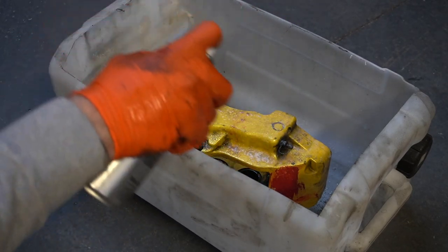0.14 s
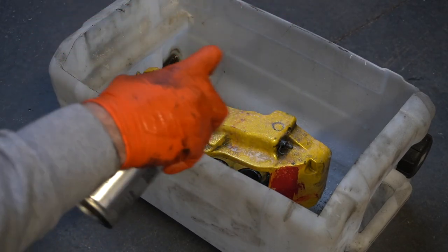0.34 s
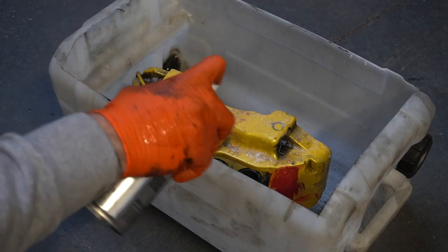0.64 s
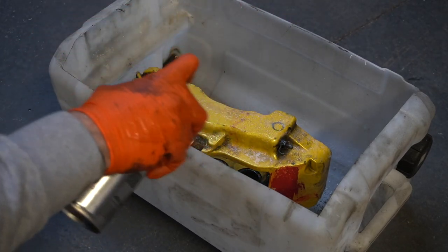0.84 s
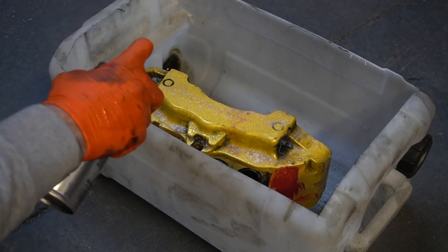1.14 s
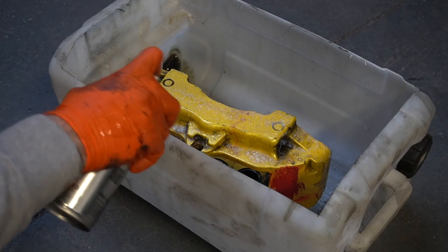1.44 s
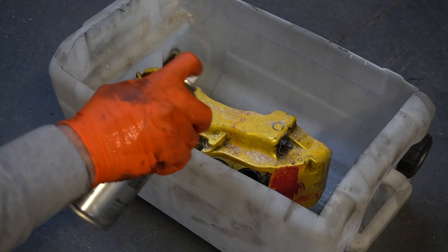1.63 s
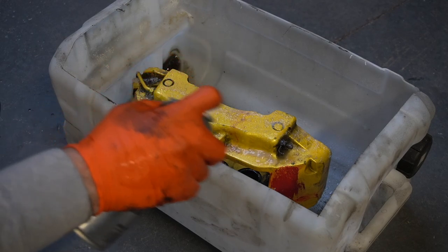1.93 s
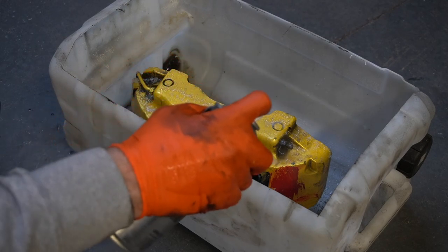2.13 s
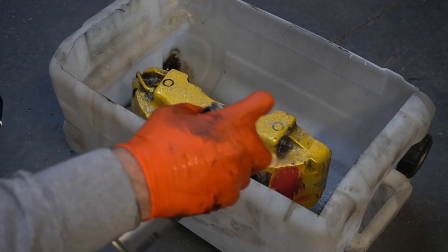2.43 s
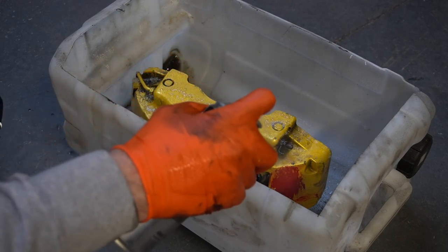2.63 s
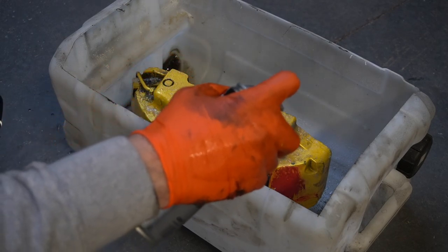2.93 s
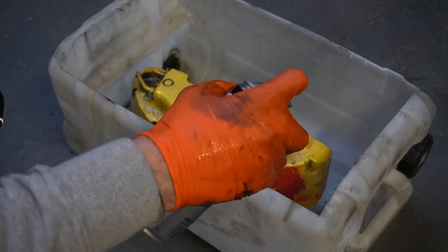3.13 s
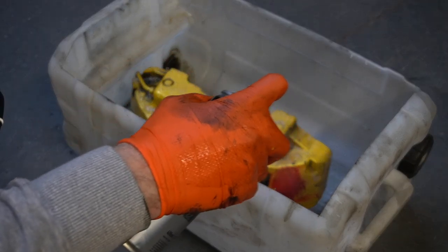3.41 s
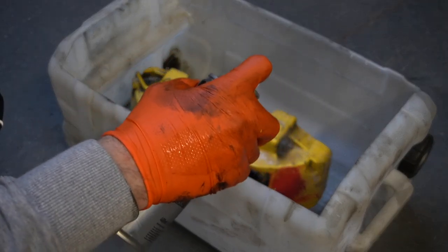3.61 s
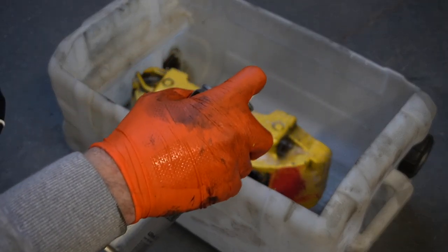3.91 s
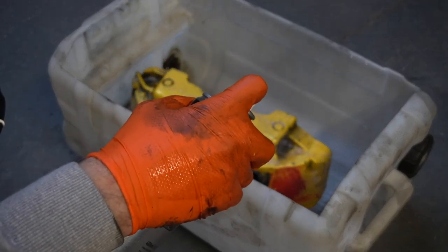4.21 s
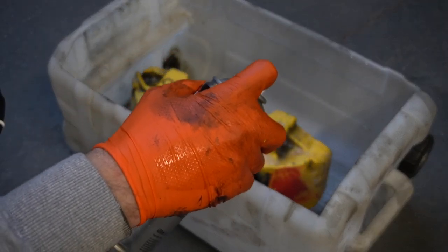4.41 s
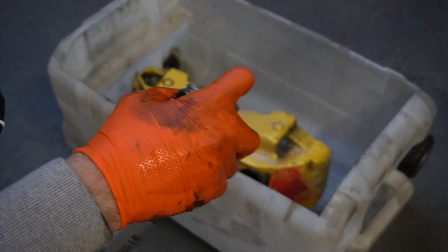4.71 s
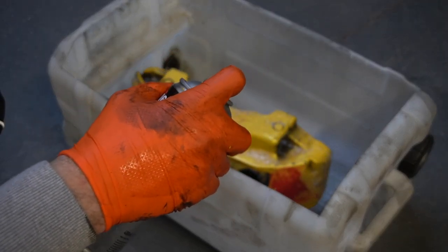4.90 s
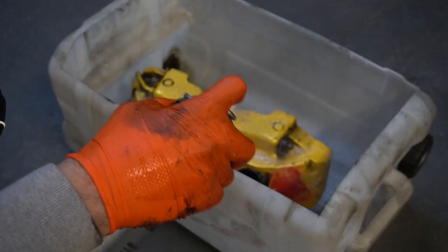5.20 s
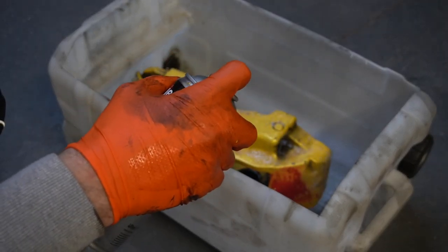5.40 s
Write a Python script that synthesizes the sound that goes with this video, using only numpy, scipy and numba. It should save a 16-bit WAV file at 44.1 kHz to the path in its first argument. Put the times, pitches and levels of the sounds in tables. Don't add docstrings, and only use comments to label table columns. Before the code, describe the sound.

Twenty-two short, sizzling aerosol puffs, each starting with a soft pop, splash onto metal inside a ringing plastic tub in a garage.

```python
import sys
import numpy as np
from scipy import signal
from scipy.fft import rfft, irfft, next_fast_len
from scipy.io import wavfile
from scipy.ndimage import uniform_filter1d
from numba import njit

SR = 44100
rng = np.random.default_rng(int(sys.argv[2]) if len(sys.argv) > 2 else 0)


def to_wav(sig):
    pcm = np.clip(np.atleast_2d(sig), -1, 1) * 32767
    pcm = np.round(pcm).astype(np.int16)
    wavfile.write(sys.argv[1], SR, pcm.T)


def volts_from_decibels(level):
    exponent = np.asarray(level, float) / 20
    return 10 ** exponent


N = 244755
TIME = np.arange(N) / SR

# opens t/s, finger lifts t/s, full jet level/dB, short of full at first/dB, splash over jet/dB
VALVE_PRESSES = [(0.025, 0.145, -42, 3, -29.5), (0.302, 0.502, -43, 7, -24.5),
                 (0.586, 0.726, -42.5, 3, -28.5), (0.813, 0.963, -42, 5, -26.5),
                 (1.056, 1.186, -43, 1, -28), (1.25, 1.37, -42.5, 6, -29), (1.460, 1.581, -42.5, 4.5, -32),
                 (1.758, 1.882, -42.5, 8, -28.5), (2.036, 2.175, -43.5, 7, -23.5),
                 (2.368, 2.487, -43.5, 6.5, -27), (2.585, 2.686, -42.5, 4, -29.5),
                 (2.773, 2.886, -43, 3.5, -28.5), (2.966, 3.099, -42.5, 2.5, -27.5),
                 (3.196, 3.322, -42, 5, -28), (3.397, 3.516, -42, 4.5, -30), (3.608, 3.715, -42.5, 4, -29),
                 (3.978, 4.088, -43.5, 10, -23.5), (4.236, 4.345, -43.5, 7.5, -25.5),
                 (4.468, 4.596, -42.5, 8, -27), (4.679, 4.798, -42, 3.5, -30),
                 (5.185, 5.299, -45, 9.5, -26), (5.466, 5.618, -42.5, 7.5, -26.5)]
# low ring/dB, high ring/dB, octave of the high ring/dB
HAND_PLACE = [(0.09, 1.87, 1440, 2170, -17, -18, -24), (0.37, 2.16, 1640, 2410, -23, -17, -9.5),
              (0.45, 1.88, 1580, 1980, -16.5, -23, -21), (0.65, 1.54, 1590, 2040, -19, -19, -30),
              (0.88, 1.71, 1340, 1990, -19, -17, -21), (1.2, 1.42, 1380, 2130, -13.5, -16.5, -22),
              (1.53, 1.49, 1480, 2150, -20.5, -19.5, -17), (1.82, 1.7, 1630, 2370, -18.5, -20, -13.5),
              (2.1, 1.97, 1510, 2270, -13.5, -12.5, -12.5), (2.43, 1.7, 1460, 2280, -14.5, -13, -20),
              (2.65, 2.03, 1450, 2280, -20.5, -13, -13.5), (2.84, 2, 1580, 2230, -17.5, -14, -28),
              (3.03, 2.05, 1490, 2310, -13.5, -15, -15.5), (3.46, 1.98, 1550, 2320, -16.5, -16.5, -16),
              (4.04, 2.24, 1420, 2180, -16, -14.5, -22), (4.5, 2.04, 1404, 2264, -18, -14.5, -15),
              (5.5, 2.21, 1370, 2260, -17, -14, -25)]


def along(table, hz):
    f, v = np.transpose(table)
    return np.interp(np.log(np.maximum(hz, 1)), np.log(f), v)


def curves(rows):
    s, *columns = np.transpose(rows)
    return [np.interp(TIME, s, c) for c in columns]


def colour(x, table):
    size = next_fast_len(x.shape[-1], True)
    gain = volts_from_decibels(along(table, np.fft.rfftfreq(size, 1 / SR)))
    return irfft(rfft(x, size) * gain, size)[..., :x.shape[-1]]


def unit(x):
    return x / np.sqrt(np.mean(x ** 2))


def shaped(table, channels=1):
    return unit(colour(rng.standard_normal((channels, N)), table))


def walk(rate):
    hold = max(int(SR / rate), 2)
    steps = rng.standard_normal(N // hold + 1)[np.arange(N) // hold]
    return unit(uniform_filter1d(uniform_filter1d(steps, hold), hold))


@njit
def late(x, ms):
    y = np.zeros(len(x))
    for i in range(len(x)):
        at = i - ms[i] * SR / 1000
        k = int(at)
        if at > 1:
            u, a, b, c, d = at - k, x[k - 1], x[k], x[k + 1], x[k + 2]
            cubic = 3 * (b - c) + d - a
            square = 2 * a - 5 * b + 4 * c - d
            y[i] = b + u * (c - a + u * (square + u * cubic)) / 2
    return y


@njit
def resonance(x, hz, width_hz):
    y, band, low = np.empty(len(x)), 0., 0.
    for i in range(len(x)):
        g, k = np.tan(np.pi * hz[i] / SR), width_hz / hz[i]
        v = (band + g * (x[i] - low)) / (1 + g * (g + k))
        band, low, y[i] = 2 * v - band, low + 2 * g * v, k * v
    return y


def stereo(mid, side):
    # f/Hz, side minus mid/dB
    capsule_width = [(60, -29), (110, -37), (200, -29), (380, -19.5), (700, -17.5), (1290, -14),
                     (2380, -18.5), (4400, -12), (8120, -6.5), (15000, -7.5)]
    side = colour(side, capsule_width)
    return np.array([mid + side, mid - side])


def hum():
    # t/s, half length/s, boom up/dB, drone up/dB
    thuds = [(0.71, 0.11, 2.5, 5), (0.83, 0.12, 4, 2), (1.14, 0.075, 2.5, 9), (2.44, 0.069, 1, -3),
             (2.837, 0.16, 0, 6), (2.947, 0.1, 2, -7), (3.57, 0.3, 4, 0.5), (4.33, 0.26, 4, 0.5),
             (4.82, 0.3, 3, 2), (5.072, 0.25, 11, -2.5), (5.26, 0.08, 9, 5), (5.55, 0.16, 11, 6)]
    # f/Hz, level/dB per Hz
    boom_colour = [(20, -21), (50, -6.5), (70, -7), (85, 3.5), (105, -3), (130, -6), (200, -63.5)]
    # f/Hz, level/dB per Hz
    drone_colour = [(90, -38), (140, -0.5), (165, -5), (200, -1), (300, -6), (450, -10), (600, -20),
                    (1000, -28.5)]
    # f/Hz, level/dB per Hz
    hiss_colour = [(300, -18), (600, 4.5), (1600, -5), (4000, -5), (8000, 0), (12000, 3), (16000, -1.5)]
    leftover_colour = [(700, -26), (1400, 1), (8000, -3), (16000, -8)]  # f/Hz, level/dB per Hz
    wander_db = 1.5

    at, half, boom_up, drone_up = np.transpose(thuds)
    swell = np.maximum(1 - np.abs(TIME[:, None] - at) / half, 0)
    boom_db = -85.5 + wander_db * walk(7.4) + swell @ boom_up
    drone_db = -79 + wander_db * walk(8) + swell @ drone_up
    air = volts_from_decibels(boom_db) * shaped(boom_colour, channels=2)
    air = air + volts_from_decibels(drone_db) * shaped(drone_colour, channels=2)
    air = air + volts_from_decibels(-76.5) * shaped(hiss_colour, channels=2)
    air = air + volts_from_decibels(-62 - 33 * TIME) * shaped(leftover_colour, channels=2)
    return stereo(air[0], volts_from_decibels(9.0) * air[1])


def leak():
    # f/Hz, level/dB per Hz
    leak_colour = [(700, -23), (1300, 0.5), (5000, -1.5), (9000, -10), (16000, -30)]
    leak_s, leak_db = 0.0063, -59.5
    opens = np.transpose(VALVE_PRESSES)[0]
    escape = sum(np.clip(1.5 - np.abs(TIME - at) / leak_s, 0, 1) for at in opens)
    return shaped(leak_colour)[0] * volts_from_decibels(leak_db) * escape


def valve():
    pop_s, pop_db_per_ms, build_s = 0.0032, 3, 0.027
    lift_lead_s, shut_db_per_ms = 0.013, 0.66
    gust_s, gust_half_s, gust_db = 2.14, 0.038, 9.5

    opens, lifts, full_db, short_db, wet_db = np.transpose(VALVE_PRESSES)
    press = np.clip(np.searchsorted(opens - 0.03, TIME) - 1, 0, None)
    since = TIME - opens[press]
    after_lift = TIME - lifts[press]

    sealed_db = 1000 * pop_db_per_ms * np.maximum(pop_s - since, 0)
    weak_db = short_db[press] * np.exp(-np.maximum(since - pop_s, 0) / build_s)
    shut_db = 1000 * shut_db_per_ms * np.maximum(after_lift + lift_lead_s, 0)
    flow_db = full_db[press] - sealed_db - weak_db - shut_db - 1.0

    sizzle_db = -1.5 + 2 * walk(24.8) - 0.32 * shut_db
    sizzle_db = sizzle_db - 4000 * np.maximum(0.002 - since, 0)

    splash_db = wet_db[press] - 1.5 + 5.0 * np.exp(-np.maximum(since, 0) / 0.011)
    splash_db = splash_db + 0.4428 * shut_db + 32 * np.minimum(after_lift + 0.041, 0.05)
    splash_db = splash_db + gust_db * np.maximum(1 - np.abs(TIME - gust_s) / gust_half_s, 0)
    return volts_from_decibels(flow_db), volts_from_decibels(sizzle_db), volts_from_decibels(splash_db)


def jet(flow, sizzle):
    # f/Hz, level/dB per Hz
    jet_colour = [(800, -38.5), (1150, -15.5), (1500, -11), (1850, -11.5), (2700, -10.5), (3400, -7),
                  (4000, -9.5), (5300, -8.5), (7500, -5.5), (9500, -2.5), (11000, -3.5), (13000, -6.5),
                  (16000, -27)]
    # f/Hz, level/dB per Hz
    sizzle_colour = [(8000, -35), (10000, -41), (11500, -9), (13500, -3), (14300, 1.5), (15100, 9.5),
                     (15900, -0.5)]
    sputter_db = 1.3 * walk(900) + 0.77 * walk(40)
    gas = rng.standard_normal(N) * volts_from_decibels(sputter_db)
    return flow * (unit(colour(gas, jet_colour)) + sizzle * unit(colour(gas, sizzle_colour)))


def rings(flow, wet):
    # f/Hz, level/dB per Hz
    splash_colour = [(200, -6), (300, -5.5), (380, -5.5), (480, -2.5), (620, -7.5), (750, -6.5), (950, -1),
                     (1200, -11)]
    _, low_hz, high_hz, low_db, high_db, octave_db = curves(HAND_PLACE)
    keep = np.exp(-1 / (0.012 * SR))
    mist = signal.lfilter([1 - keep], [1, -keep], flow)

    def ring(stir, hz, width_hz):
        return unit(resonance(resonance(stir, hz, width_hz), hz, width_hz))

    stir = rng.standard_normal((3, N)) * volts_from_decibels(1.1 * walk(60))
    low = ring(stir[0], low_hz, 380.)
    high = ring(stir[1], high_hz, 330.)
    octave = ring(stir[2], 2 * high_hz, 420.)
    splash = shaped([(60, -50), *splash_colour, (2500, -49)])[0] * volts_from_decibels(2.7 * walk(50))
    bright = volts_from_decibels(high_db) * high + volts_from_decibels(octave_db) * octave
    return mist * volts_from_decibels(low_db - 2.0) * low + flow * (bright + wet * splash)


def tub(hiss, ring):
    # t/s, left minus right/dB
    bearing = [(0.01, 1), (0.6, 0.6), (1.2, 1.3), (2.1, 0.3), (3.2, -0.5), (4.2, 0.5), (5.5, 0)]
    wall_ms, pan_db = curves(HAND_PLACE)[0], curves(bearing)[0]
    wall_echo = volts_from_decibels(-9) * late(hiss, wall_ms)
    part_echo = volts_from_decibels(-16) * late(hiss, np.full(N, 0.399))
    clear = ring + hiss + wall_echo + part_echo

    mid, side, both = 0, 0, hiss + ring
    for far, stretch, turn in rng.random((24, 3)):
        path_ms = 1 + 10 * far + 3 * stretch * wall_ms
        echo = late(both, path_ms) * volts_from_decibels(-8.0 * far)
        mid = mid + echo * np.cos(2 * np.pi * turn)
        side = side + echo * np.sin(2 * np.pi * turn)
    scatter = volts_from_decibels(-10.5) * stereo(mid, volts_from_decibels(5.5) * side)
    return (clear + scatter) * volts_from_decibels(np.array([pan_db, -pan_db]) / 2)


def garage(x):
    # f/Hz, time to fall 60 dB/s
    decay_t60 = [(200, 0.99), (1500, 0.56), (4000, 0.51), (9000, 0.39), (15000, 0.25)]
    t = TIME[:SR // 2]
    tail = 0
    for hz in 250 * 2 ** np.arange(0, 6.5, .5):
        band = [(hz / 2 ** .5, -60), (hz / 2 ** .25, -3), (hz, 0), (hz * 2 ** .25, -3), (hz * 2 ** .5, -60)]
        decay = 1000. ** (-t / along(decay_t60, hz))
        tail = tail + colour(rng.standard_normal((2, len(t))), band) * decay
    onset = 1 - np.exp(-t / 0.016)
    tail = tail * onset / np.sqrt(np.sum(tail[0] ** 2))
    mid, side = signal.fftconvolve(x[None], tail, axes=1)[:, :N]
    return volts_from_decibels(-8.5) * stereo(mid, volts_from_decibels(8.5) * side)


def spits():
    # t/s, peak level/dB
    cracks = [
        (0.7064, -33),
        (2.4016, -19),
        (4.741, -30),
        (5.5035, -26),
    ]
    ticks = np.zeros(N)
    for at, peak_db in cracks:
        ticks[int(at * SR)] = 2 * volts_from_decibels(peak_db)
    return resonance(ticks, np.full(N, 11500.), 6500)


def scene():
    air = hum()
    flow, sizzle, wet = valve()
    hiss = leak() + jet(flow, sizzle) + spits()
    ring = rings(flow, wet)
    return tub(hiss, ring) + garage(hiss + ring) + air


def band_limit(x):
    return signal.sosfilt(signal.butter(12, 17100, fs=SR, output="sos"), x)


def record(dry):
    top_hz = 15780
    top_cut = signal.ellip(14, .2, 100, top_hz, fs=SR, output="sos")
    mix = signal.sosfilt(top_cut, dry)
    return band_limit(mix)


dry = scene()
out = record(dry)
to_wav(out)
```